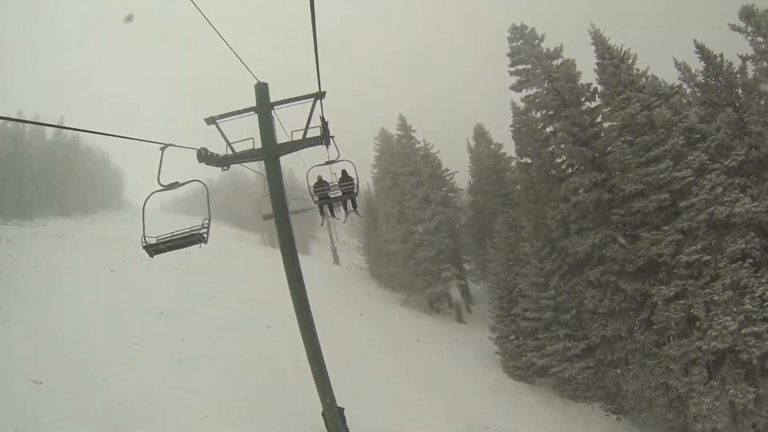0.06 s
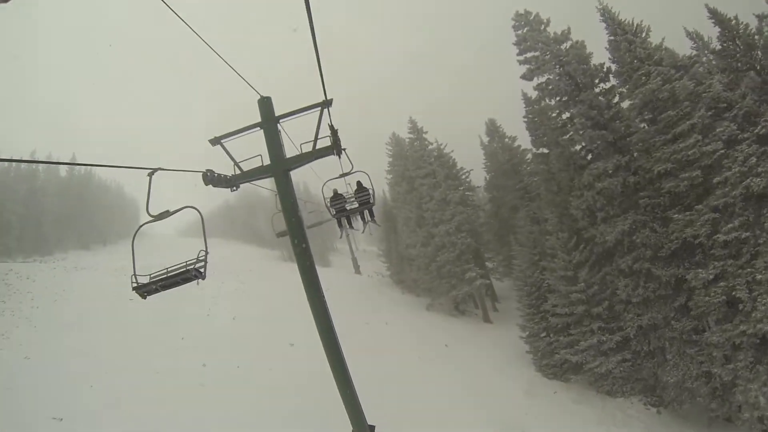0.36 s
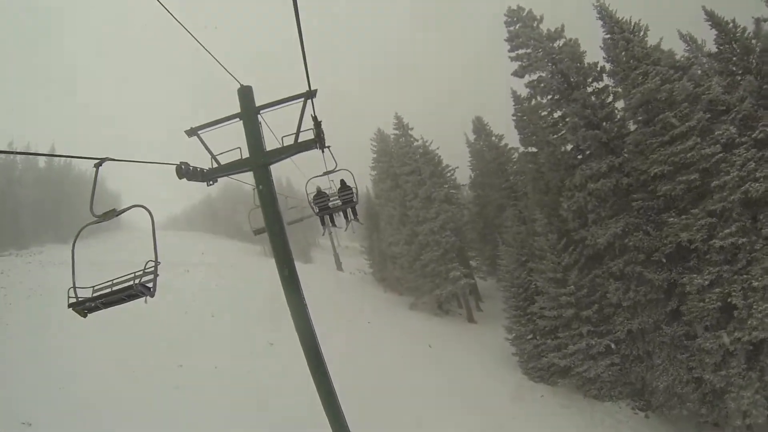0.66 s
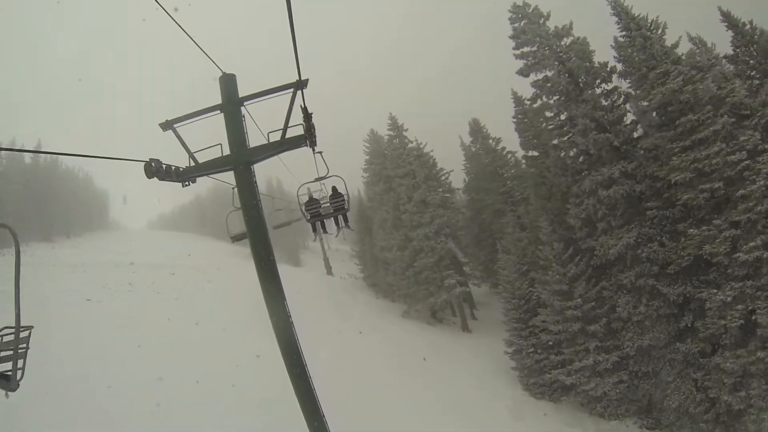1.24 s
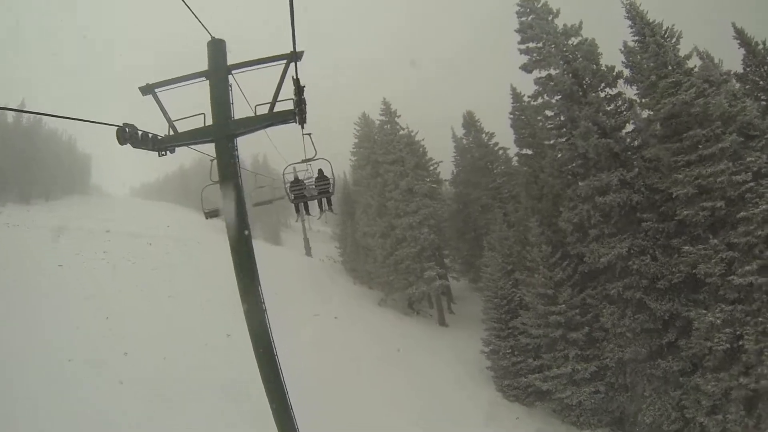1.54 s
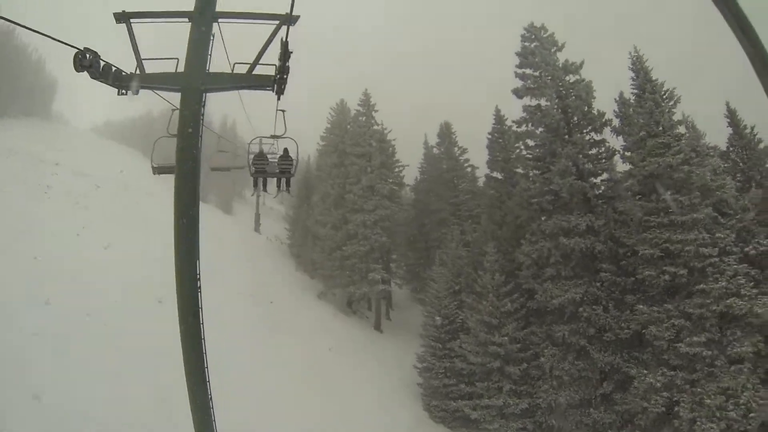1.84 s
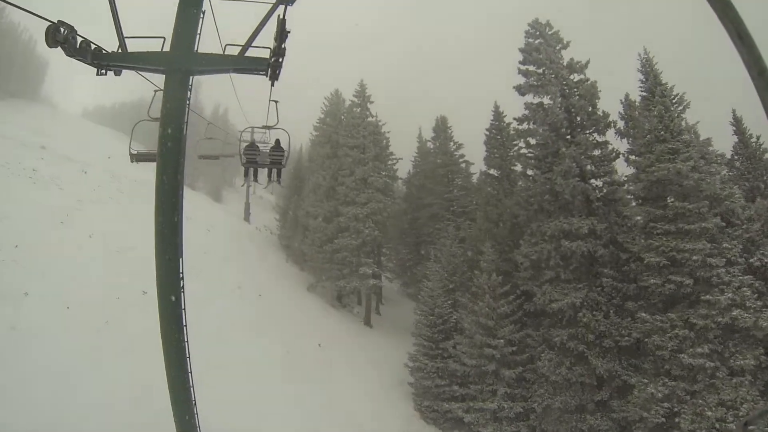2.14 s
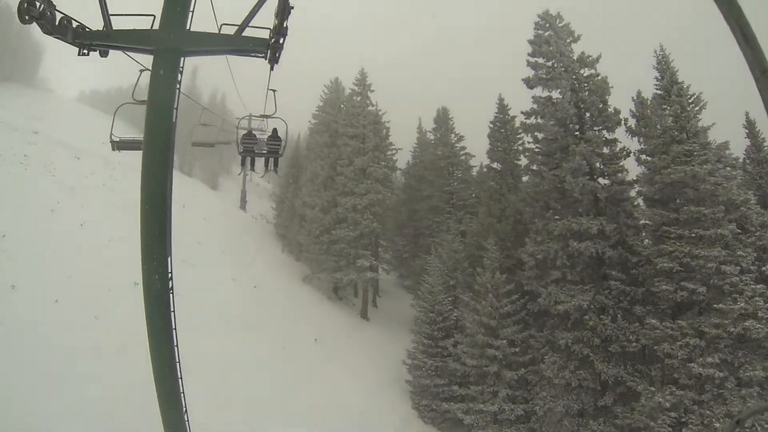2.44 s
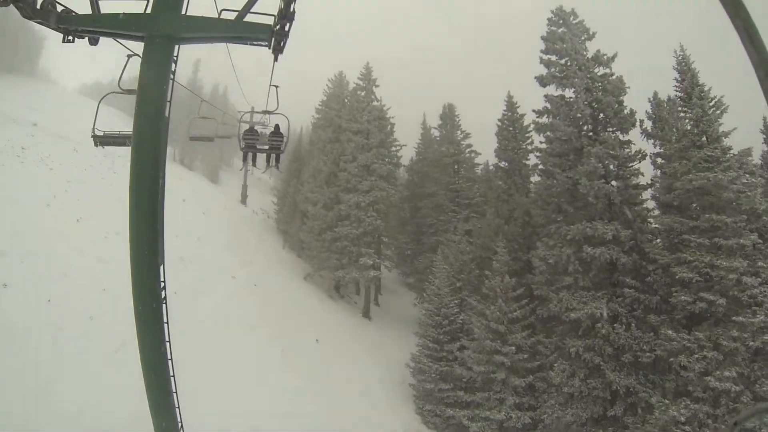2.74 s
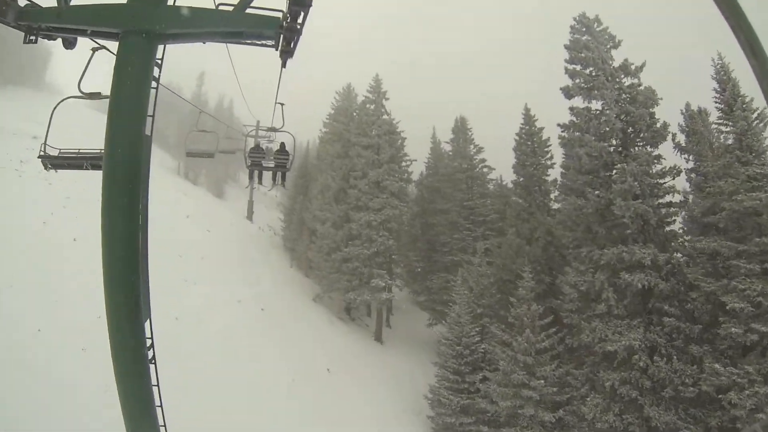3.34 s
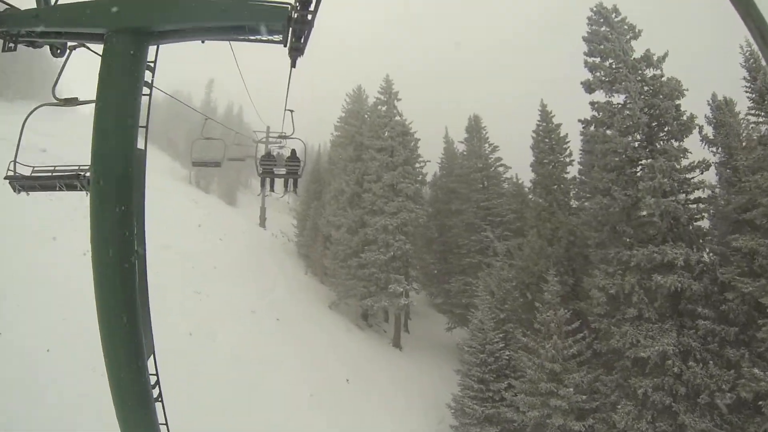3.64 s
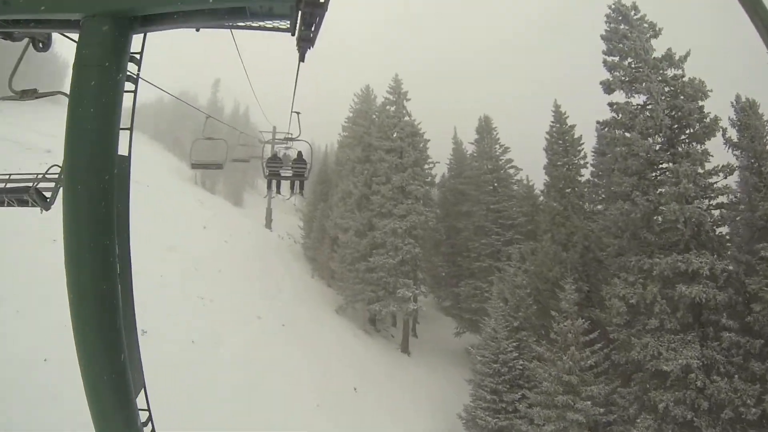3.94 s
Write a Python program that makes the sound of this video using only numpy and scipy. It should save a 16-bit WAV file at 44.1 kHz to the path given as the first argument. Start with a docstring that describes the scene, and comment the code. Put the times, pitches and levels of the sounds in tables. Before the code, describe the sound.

Irregular clicks and taps on a plastic camera case over a chairlift's low shudder and wind.

```python
"""On a chairlift in falling snow, heard from a camera in a plastic case.
The chair's low shudder swells as the tower nears, over wind rumble and a fine patter of flakes.
Icy pellets and handling click, tap and tick on the case, each exciting its short resonances;
the hard clicks also set a small, loose metal fitting ringing."""
import sys
import numpy as np
from scipy import signal
from scipy.fft import rfft, irfft, next_fast_len
from scipy.io import wavfile
from scipy.ndimage import map_coordinates

SR = 44100
rng = np.random.default_rng(int(sys.argv[2]) if len(sys.argv) > 2 else 0)


def int16_out(signal):
    """Quantize to a 16-bit WAV file."""
    q = np.round(np.clip(np.atleast_2d(signal).T, -1, 1) * 32767)
    wavfile.write(sys.argv[1], SR, q.astype(np.int16))


N = 176400


def amp(db):
    """Decibels to gain."""
    return 10 ** (np.asarray(db) / 20)


def unit(x):
    """Scale to rms 1."""
    return x / np.sqrt(np.mean(x ** 2) + 1e-20)


def curve(rows):
    """An automation curve, one value a sample, from (t/s, value) breakpoints."""
    return np.interp(np.arange(N) / SR, *np.transpose(rows))


def wobble(per_s):
    """A smooth random drift through per_s points a second."""
    points = rng.standard_normal(int(N * per_s / SR) + 4)
    return map_coordinates(points, [np.arange(N) * per_s / SR])


def coloured(x, eq):
    """x through a minimum-phase EQ of (f/Hz, gain/dB) points, at rms 1."""
    size = 2 * next_fast_len(N)
    hz, db = np.transpose(eq)
    gain_db = np.interp(np.log(np.fft.rfftfreq(size, 1 / SR) + 1), np.log(hz), db)
    cepstrum = irfft(np.log(amp(gain_db)), size)
    cepstrum[1:size // 2] *= 2  # folded onto positive time: no pre-ring
    cepstrum[size // 2 + 1:] = 0
    return unit(irfft(rfft(x, size) * np.exp(rfft(cepstrum)), size)[:N])


def ring(modes, t, detune, spread_db=4):
    """Damped modes, their levels and pitches scattered afresh at each blow."""
    hz, db, t60 = np.transpose(modes)[:, :, None]
    sharper, louder = rng.standard_normal((2, len(modes), 1))
    envelopes = amp(db + spread_db * louder) * 1000 ** (-t / t60)
    return np.sum(envelopes * np.sin(2 * np.pi * hz * (1 + detune * sharper) * t), axis=0)


def add(track, s, sound):
    """Mix a sound in at s seconds."""
    part = track[max(round(s * SR), 0):][:len(sound)]
    part += sound[:len(part)]


def chair_shudder():
    """The chair shakes at a wavering rate; loose parts buzz once a cycle, most at the peaks."""
    # swell of the shudder: t/s, level/dB
    swell = [(0, -23), (.26, -22), (.37, -34.5), (.58, -36), (.82, -22.5), (.93, -21), (1.1, -34.5),
             (1.24, -38.5), (1.4, -18.5), (1.55, -21), (1.6, -28), (1.77, -18.5), (1.81, -29.5),
             (1.87, -11.5), (1.94, -26), (2, -15), (2.22, -14.5), (2.27, -27.5), (2.34, -19.5),
             (2.52, -19.5), (2.57, -16), (2.8, -13), (2.92, -16), (2.99, -29.5), (3.28, -17), (3.52, -22.5),
             (3.94, -24.5), (4, -19)]
    # rate of the shaking: t/s, f/Hz
    shake_rate = [(.3, 53.06), (1.0, 46.94), (1.4, 54), (1.8, 48.78), (2.2, 55.13), (2.45, 47.36),
                  (2.72, 55.11), (4, 51)]
    # tone of the buzz: f/Hz, level/dB
    buzz_eq = [(70, -4.5), (140, 1), (300, -17), (700, -24.5), (1500, -29), (4000, -36.5), (12000, -81)]
    waver_db, waver_hz, buzz_db, buzz_growth = 0.8, 1.56, -25.5, 2.02
    level = amp(curve(swell) + waver_db * wobble(per_s=22.3))
    hz = curve(shake_rate) + waver_hz * wobble(per_s=18)
    phase = 2 * np.pi * np.cumsum(hz) / SR
    buzz = coloured(rng.standard_normal(N) * (1 + np.sin(phase)) ** 2, buzz_eq)
    buzz_level = amp(buzz_db) * level.max() * (level / level.max()) ** buzz_growth
    return level * np.sqrt(2) * np.sin(phase) + buzz_level * buzz


def wind():
    """A bed of low wind rumble, gently rising and falling."""
    # tone of the wind: f/Hz, level/dB
    rumble_eq = [(8, -6.5), (31, -1), (68, -20.5), (100, -39.5), (400, -53), (900, -55.5), (2000, -78),
                 (16000, -110)]
    level_db = -28 + 1.9 * wobble(per_s=5.2)
    return amp(level_db) * coloured(rng.standard_normal(N), rumble_eq)


def frame_drone():
    """Wind and cable stir narrow, low resonances in the chair's frame."""
    # resonances of the frame: f/Hz, width/Hz, rms level/dB
    resonances = [(46.74, 7.1, -34), (61.5, 6.9, -36.5), (90.7, 4.99, -44)]
    out, f = np.zeros(N), np.fft.rfftfreq(N, 1 / SR)
    for hz, width, db in resonances:
        spectrum = rfft(rng.standard_normal(N)) / (1 + ((f - hz) / width * 2) ** 2) ** 2
        out += amp(db) * unit(irfft(spectrum, N))
    return out


def snow_patter():
    """Flakes land on the case, each a tiny ping of its own pitch and size, over a soft hiss of air."""
    # tone of snow on the case: f/Hz, level/dB
    snow_eq = [(300, -28), (880, -17.5), (1080, -20), (1530, 0), (2220, -18), (3200, -10), (4200, -21.5),
               (4850, -18), (5080, -13), (5350, -21.5), (6600, -21.5), (9800, -23), (13500, -31.5),
               (16000, -75.5)]
    # strength of the patter: t/s, level/dB
    flurries = [(0, -55), (.93, -53), (.97, -48.5), (1.08, -54), (2.25, -52.5), (3.0, -58.5), (3.68, -55),
                (4, -56.5)]
    flakes_per_s, centre_hz, spread_octaves, ring_cycles = 120, 2636, 1.38, 4
    hiss = coloured(rng.standard_normal(N), snow_eq)
    flakes, t = np.zeros(N), np.arange(SR // 100) / SR
    for when, size, up, down in rng.random((int(flakes_per_s * N / SR), 4)):
        hz = centre_hz * 2 ** (spread_octaves * (up - down))
        db = 7 * min(-np.log(1 - size), 3)  # mostly faint, a few up to 21 dB louder
        envelope = amp(db) * 1000 ** (-t * hz / ring_cycles)
        add(flakes, when * N / SR, envelope * np.sin(2 * np.pi * hz * t))
    return amp(curve(flurries)) * (amp(-1.5) * coloured(flakes, snow_eq) + amp(-7.5) * hiss)


def case_hit(colour_db, spot_hz=3067, soft=False):
    """A gritty contact rings the case; colour_db sets thud, bite, snap and crack against the body."""
    # modes of the plastic case: f/Hz, level/dB, t60/s
    case_modes = [(247, -7, 0.044), (490, -1.5, 0.004), (887, 9.5, 0.024), (1578, 9.5, 0.021),
                  (1871, 11, 0.0092), (2545, -1, 0.011), (4794, 4, 0.0045), (5934, -1, 0.012),
                  (10490, -18, 0.0099), (13100, -17.5, .004)]
    # bands of a hit (body, thud, bite, snap, crack): low edge/Hz, high edge/Hz
    band_edges = [(1180, 2000), (170, 1000), (2300, 4000), (4300, 8000), (8500, 15000)]
    grit, grit_t60_s, soft_cutoff_hz = 0.06, 0.01, 920
    spot_db, spot_t60_s = 14.5, 0.006  # the struck spot's own mode
    t = np.arange(SR // 12) / SR
    contact = grit * rng.standard_normal(len(t)) * 1000 ** (-t / grit_t60_s)
    contact[0] = 1  # the first touch, ahead of the grit
    if soft:
        contact = signal.sosfilt(signal.butter(1, soft_cutoff_hz, fs=SR, output='sos'), contact)
    shell = ring(case_modes, t, detune=0.048)  # each spot rings a little differently
    spot = ring([(spot_hz, spot_db, spot_t60_s)], t, detune=0)
    struck = signal.fftconvolve(contact, shell + spot)[:len(t)]
    hit = np.zeros(len(t))
    for edges, gain in zip(band_edges, amp([0, *colour_db])):
        band = signal.sosfilt(signal.butter(3, edges, 'bandpass', fs=SR, output='sos'), struck)
        hit += gain * band / np.linalg.norm(band)
    return np.sqrt(.005 * SR) * hit  # the body carries the energy of 5 ms at rms 1


def fitting_rattle():
    """The loose metal fitting seats differently each time; each mode splits into a beating trio."""
    # modes of the fitting: f/Hz, level/dB, t60/s
    metal_modes = [(928, -1, 0.078), (1520, -4, 0.02), (2550, 3.5, 0.075), (2970, -4, 0.12),
                   (3520, -4.5, 0.16), (3650, -14, 0.13), (4630, -0.5, 0.06), (4910, -14, 0.11),
                   (5670, -11, 0.11), (7030, -6.5, 0.07)]
    t = np.arange(SR // 6) / SR
    return sum(ring(metal_modes, t, detune=0.022) for _ in range(3))


def hard_clicks():
    """Hard hits on the case; the more bite and snap they have, the louder the fitting rings."""
    # clicks: t/s, body level/dB, then against the body thud/dB, bite/dB, snap/dB, crack/dB; spot f/Hz
    cues = [(0.0284, -47.5, -1, 11.5, 8, 0.5, 3180), (0.3482, -19.5, -20.5, 3, -2.5, -15, 3200),
            (0.4122, -20.5, -10, -8, -10.5, -8.5, 3180), (0.704, -30.5, -17.5, -11.5, -13, -25.5, 3400),
            (1.4613, -30.5, -11.5, 6, 3.5, -3, 3200), (1.499, -33, -23, 3.5, -4.5, -23, 3260),
            (1.905, -25, -18.5, 5, -5, -14, 3060), (1.9833, -28, -20, -5, -9, -11.5, 3240),
            (2.013, -31.5, -17.5, -8.5, -12, -30, 3230), (2.352, -26, -22, 6.5, 3, -11, 2880),
            (2.6082, -33.5, -37, -8, -3.5, -19.5, 3137), (2.7612, -19.5, -48.5, -4.5, -8.5, -20.5, 3110),
            (3.129, -41.5, -4, 3.5, -8.5, -15, 3434), (3.2592, -40, -21, 2.5, -1.5, -12.5, 3040),
            (3.336, -24, -26, -2.5, -18, -21, 2991), (3.346, -24.5, -18, -5, -6, -22, 3211),
            (3.4105, -30, -3, 17, 3.5, -7.5, 3800), (3.5744, -41, -21, 11, 5, -4, 3246),
            (3.6097, -36.5, -17, 1.5, -4.5, -13, 3210), (3.6836, -35.5, -13, -0.5, -1.5, -12, 5330),
            (3.7751, -15.5, -63, -2.5, -12.5, -22, 2655), (3.7973, -40, -16, -11, -8, -23, 3165)]
    out, fitting_db = np.zeros(N), -27
    for s, db, thud, bite, snap, crack, spot_hz in cues:
        add(out, s, amp(db) * case_hit([thud, bite, snap, crack], spot_hz))
        add(out, s, amp(db + fitting_db + (bite + snap) / 2) * fitting_rattle())
    return out


def soft_taps():
    """Soft contacts knock dully on the case, their top end rolled off."""
    # taps: t/s, body level/dB, then against the body thud/dB, bite/dB
    cues = [(0.329, -38.5, -33, -3), (0.4704, -37, -13, -1), (0.5596, -33, -32, -1),
            (1.1551, -33.5, -8.5, -14), (1.3532, -40.5, -29, 4.5), (1.5371, -42.5, -30, 3.5),
            (1.657, -32.5, -35, -10.5), (1.8073, -28.5, -19, -13.5), (1.8379, -11.5, -28.5, -11.5),
            (1.9748, -25.5, -22, -9.5), (2.1398, -37, -9.5, -15), (2.337, -34.5, -30, -2),
            (2.344, -18.5, -13, -2), (2.3552, -26.5, -13.5, 0), (2.3927, -33, -18, -6),
            (2.9984, -40.5, -12.5, -15), (3.0245, -31.5, -18.5, -5.5), (3.1567, -30.5, -7, -18),
            (3.1887, -39.5, -22, -12), (3.415, -24, -19, -4.5), (3.5295, -39.5, -21, -10.5),
            (3.6732, -21, -28.5, -12.5), (3.9846, -34.5, -13, -6)]
    out = np.zeros(N)
    for s, db, thud, bite in cues:
        snap, crack = bite - 17.5, bite - 34.5
        add(out, s, amp(db) * case_hit([thud, bite, snap, crack], soft=True))
    return out


def ice_ticks():
    """Grains of ice strike the case with tiny, bright ticks."""
    # ticks: t/s, body level/dB
    cues = [(0.6636, -47.5), (1.0433, -47), (1.115, -49), (1.1235, -43.5), (1.6797, -41.5), (2.2095, -45),
            (2.4552, -43.5), (2.6292, -42), (2.6507, -43.5), (2.6782, -46.5), (3.6498, -40)]
    # colour of a tick against its body: thud/dB, bite/dB, snap/dB, crack/dB
    colour_db = [-16, -1, -5.5, -13.5]
    out = np.zeros(N)
    for s, db in cues:
        add(out, s, amp(db) * case_hit(colour_db))
    return out


def scene():
    """Hits, chair and weather all reach the one microphone inside the case."""
    hits = hard_clicks() + soft_taps() + ice_ticks()
    return (hits + chair_shudder() + wind() + frame_drone() + snow_patter())[None]


def record(dry):
    """The camera's band limit: a steep high cut."""
    cutoff_hz = 16200
    return signal.sosfilt(signal.ellip(10, .1, 90, cutoff_hz, fs=SR, output='sos'), dry)


dry = scene()
out = record(dry)
int16_out(out)
```